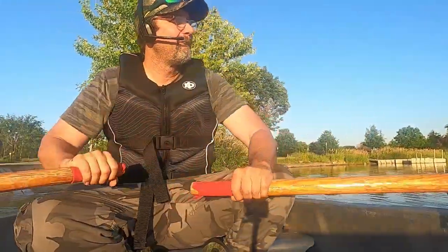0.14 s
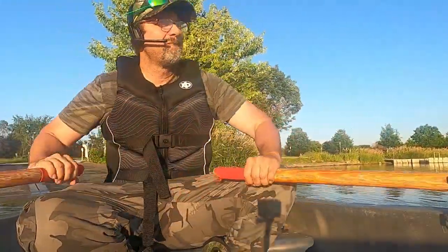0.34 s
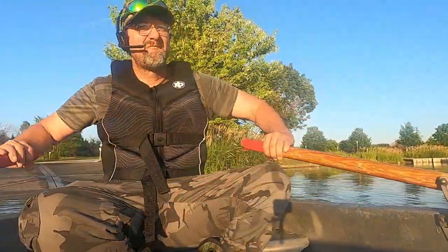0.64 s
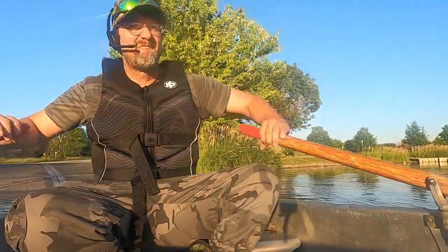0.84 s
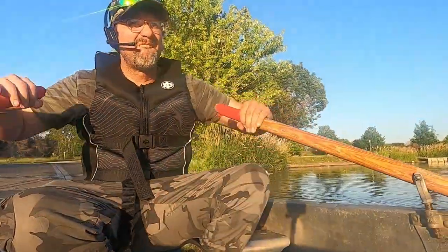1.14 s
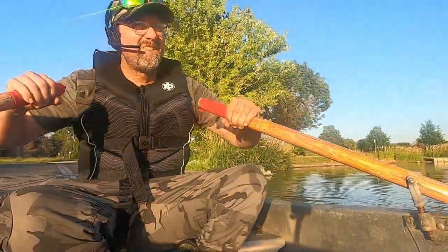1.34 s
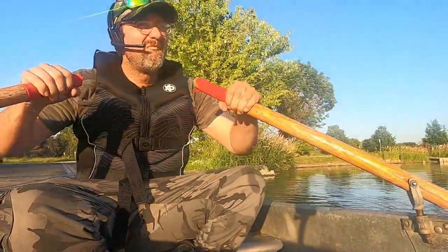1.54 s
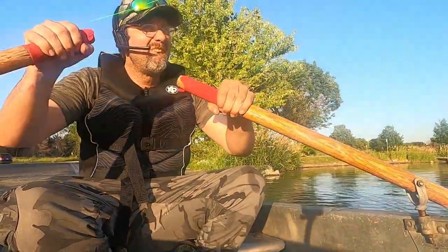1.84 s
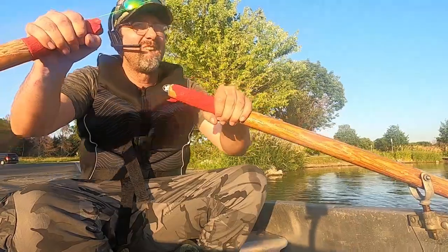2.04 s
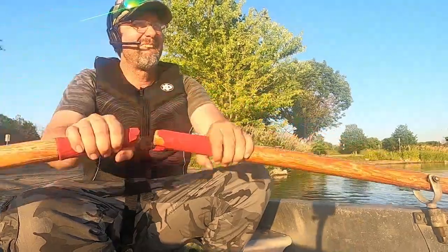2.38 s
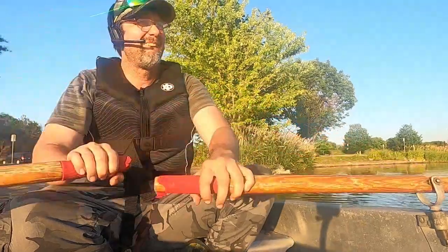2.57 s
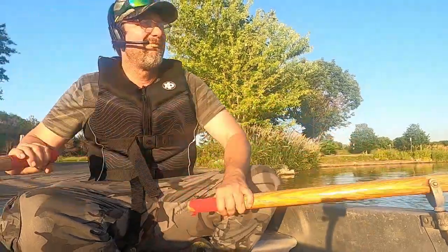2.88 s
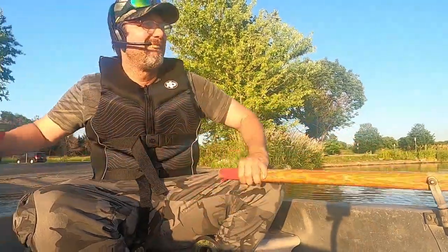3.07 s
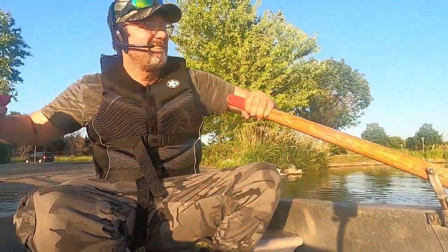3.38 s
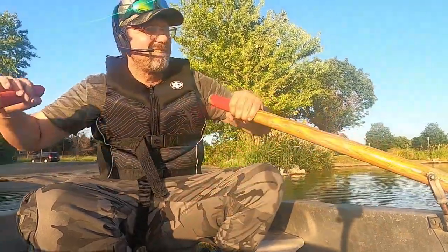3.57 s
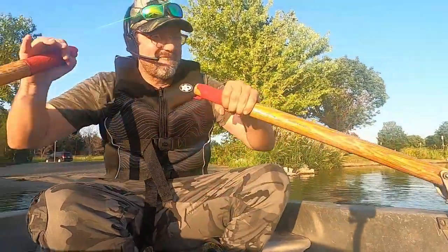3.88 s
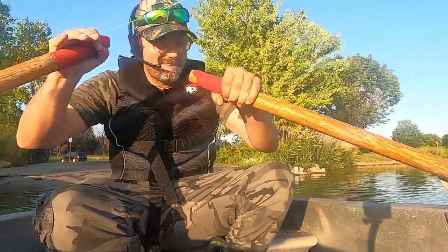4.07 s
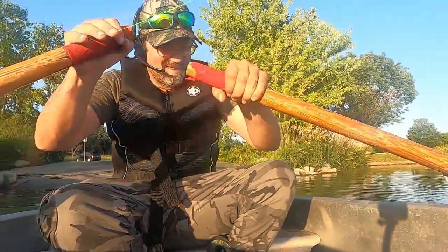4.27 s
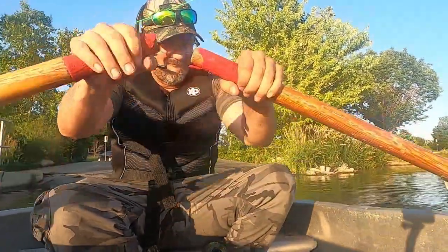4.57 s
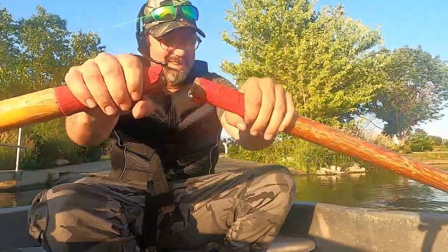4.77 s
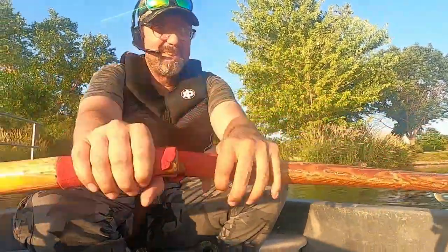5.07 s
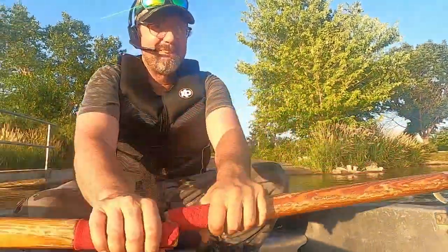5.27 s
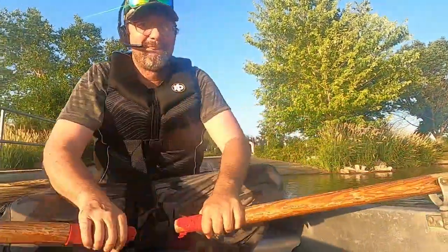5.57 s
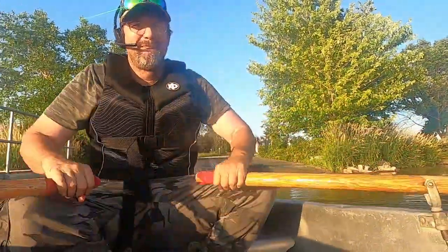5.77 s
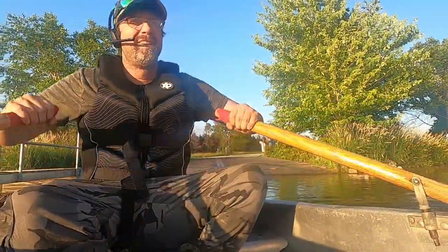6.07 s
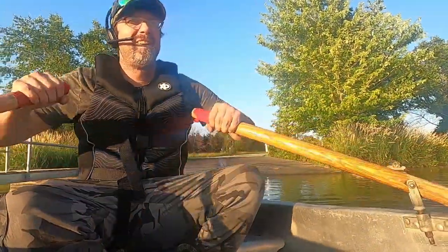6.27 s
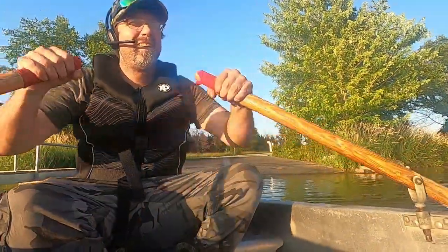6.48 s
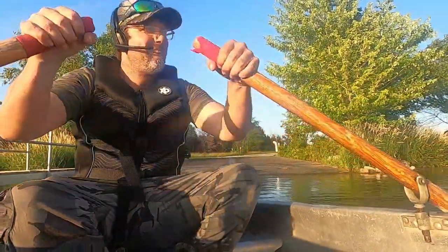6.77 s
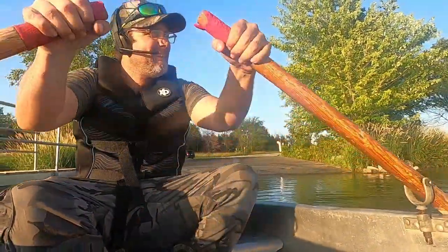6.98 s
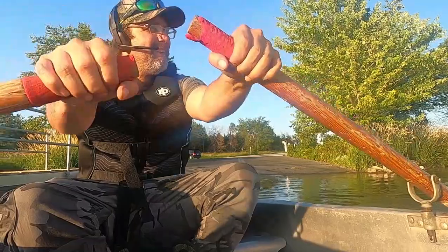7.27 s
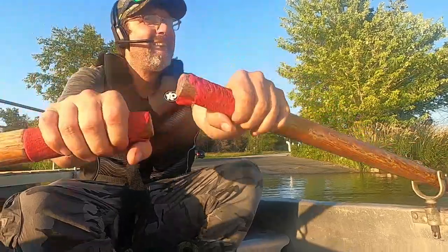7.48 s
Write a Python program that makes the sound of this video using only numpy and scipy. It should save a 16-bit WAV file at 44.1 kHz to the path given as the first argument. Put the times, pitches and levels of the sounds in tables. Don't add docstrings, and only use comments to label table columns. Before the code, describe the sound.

Close-up rowing on open water: heavy hull thuds, sharp woody clacks, metallic ticks and rasps, bubbly plops, and faint distant birdsong.

```python
import sys
import numpy as np
from scipy import signal
from scipy.fft import rfft, irfft, next_fast_len
from scipy.io import wavfile
from scipy.ndimage import uniform_filter1d, map_coordinates

SR = 44100
rng = np.random.default_rng(int(sys.argv[2]) if len(sys.argv) > 2 else 0)


def to_wav(sig):
    pcm = np.clip(np.atleast_2d(sig), -1, 1) * 32767
    pcm = np.round(pcm).astype(np.int16)
    wavfile.write(sys.argv[1], SR, pcm.T)


def voltage_ratio(level):
    return 10 ** (np.asarray(level, float) / 20)


N = 336483

# frequency in Hz, width in Hz, level in dB.
HULL_MODES = [(38, 16.3, -7), (70.9, 16.9, -1), (113, 24.1, 1), (157.5, 31, 0.5), (176.8, 30.4, -0.5),
              (217.6, 33, -2.5), (259.8, 47, -9), (362.4, 54, -15)]
# frequency in Hz, width in Hz, level in dB.
SHAFT_MODES = [(356, 150, 1), (526, 210, -1.5), (648, 112, -0.5), (1060, 175, -5.5)]
# frequency in Hz, width in Hz, level in dB.
LOCK_MODES = [(1350, 280, 0), (1787, 1020, -0.5), (2480, 1010, 0.5), (3000, 510, 0), (4200, 640, -6.5)]
# frequency in Hz, width in Hz, level in dB.
PIN_MODES = [(4820, 2900, 11.15), (6570, 1300, 15.8), (8500, 1060, 16.1), (11960, 1700, 4.6)]


def unit(x):
    return x / np.sqrt(np.mean(x ** 2, axis=-1, keepdims=True) + 1e-20)


def along(points, hz):
    f, v = np.transpose(points)
    return np.interp(np.log(hz + 1), np.log(f + 1), v)


def wobble(rate):
    knots = rng.standard_normal(int(N * rate / SR) + 4)
    return map_coordinates(knots, [np.arange(N) * rate / SR])


def filtered(x, response):
    n = x.shape[-1]
    m = next_fast_len(n + min(n // 4, 4096))
    return irfft(rfft(x, m) * response(np.fft.rfftfreq(m, 1 / SR)), m)[..., :n]


def modes(table):
    def response(f):
        total = 0
        for k, (c, w, db) in enumerate(table):
            total = total + (-1) ** k * voltage_ratio(db) * 1j * f * w / (c * c - f * f + 1j * f * w)
        return total
    return response


def ports(pair):
    # frequency in Hz, left-right correlation as a share.
    likeness = [(50, 0.93), (300, 0.98), (1000, 0.73), (4000, 0.63), (10000, 0.4)]

    def turn(hz):
        return np.arccos(np.clip(along(likeness, hz), -1, 1)) / 2

    mid = filtered(pair[0], lambda hz: np.cos(turn(hz)))
    side = filtered(pair[1], lambda hz: np.sin(turn(hz)))
    return np.array([mid + side, mid - side])


def panned(x, db):
    return x * voltage_ratio(db * np.array([[.5], [-.5]]))


def placed(sounds, times):
    first = np.round(times * SR).astype(int)
    at = (first[:, None] + np.arange(np.shape(sounds)[-1])).ravel()
    return np.array([np.bincount(at, np.ravel(c), N)[:N] for c in sounds])


def bursts(t60, rise, body, chatter_db, blow, ring_hz=0, ring_db=-60, ring_q=5, dull_hz=20000,
           size=SR // 6):
    t = np.arange(size) / SR
    raw = np.moveaxis(rng.standard_normal((len(t60), 3, size)), 1, 0)
    firm_s = 0.008
    loose = (unit(uniform_filter1d(raw[2], 130)) - .5) * (1 - np.exp(-t / firm_s))
    life = t / np.clip(t60, .01, 1)[:, None]
    force = raw[:2] * voltage_ratio(-60 * life / 0.5)
    force = force + 1.96 * uniform_filter1d(raw[:2], size=7) * voltage_ratio(-60 * life)
    force = force * (1 - np.exp(-t / rise)) * voltage_ratio(chatter_db * loose)
    force[0] -= blow * (t / rise) * np.exp(-t / rise)
    c, soft = np.reshape(ring_hz, (-1, 1)), np.reshape(dull_hz, (-1, 1))

    def response(f):
        damping = 1j * f * c / ring_q
        ring = 1 + voltage_ratio(ring_db) * damping / (c * c - f * f + damping + 1e-9)
        return modes(body)(f) * ring / (1 + 1j * f / soft) ** 2

    out = filtered(force, response)
    return out / np.abs(out[0]).max(axis=-1, keepdims=True)


def rubbing(colour, lump_db, lump_rate, patchy_db):
    z = signal.stft(rng.standard_normal((2, N)), nperseg=512)[2]
    field = uniform_filter1d(rng.standard_normal(z.shape[1:]), 5, 0)
    field = uniform_filter1d(field, 6, 1)
    pair = signal.istft(z * voltage_ratio(patchy_db * field / field.std()), nperseg=512)[1][:, :N]
    return unit(filtered(pair * voltage_ratio(lump_db * wobble(lump_rate)), colour))


def bird():
    # start in s, end in s, first pitch in Hz, last pitch in Hz, level in dB.
    notes = [(.005, 0.026, 3080, 2780, -45), (.03, 0.062, 2620, 2550, -50), (0.06, 0.113, 2250, 2230, -50),
             (0.14, 0.217, 4070, 4100, -55), (0.382, 0.441, 2980, 2980, -33.5),
             (.42, 0.464, 2800, 2270, -42), (0.49, .532, 2600, 2260, -41), (0.882, 0.906, 3000, 3230, -42),
             (0.902, 0.934, 3070, 2720, -34), (1.492, 1.529, 2866, 2980, -37.5),
             (1.536, 1.567, 2610, 2655, -34.5), (1.56, 1.63, 2450, 2250, -44),
             (1.69, 1.732, 2110, 2150, -47), (1.893, 1.94, 2800, 2650, -46),
             (1.935, 1.965, 2600, 2500, -46), (1.98, 2.008, 3250, 3300, -48.5),
             (1.992, 2.078, 2500, 2420, -38), (2.076, 2.138, 2600, 2750, -34),
             (2.135, 2.163, 2750, 2700, -45), (2.563, 2.601, 2800, 3000, -44),
             (2.612, 2.632, 2650, 2800, -46), (2.634, 2.679, 2420, 2230, -49),
             (2.698, 2.72, 2550, 2550, -49), (2.72, 2.751, 2300, 2000, -52), (2.75, 2.794, 1960, 2150, -51),
             (3.135, 3.196, 2500, 2540, -50), (7.075, 7.131, 2720, 2830, -31.5),
             (7.119, 7.156, 2540, 2520, -34.5), (7.525, 7.552, 2680, 2680, -38),
             (7.548, 7.596, 2950, 2930, -32.5), (7.592, 7.62, 2640, 2480, -35)]
    start, end, from_hz, to_hz, db = np.transpose(notes)[..., None]
    t = np.arange(SR // 8) / SR
    u = np.clip(t / (end - start), 0, 1)
    arch = 1 + 0.0384 * np.sin(np.pi * u)
    waver = 1 + 0.01 * unit(uniform_filter1d(rng.standard_normal(u.shape), 300))
    hz = (from_hz + (to_hz - from_hz) * u) * arch * waver
    tone = np.sin(2 * np.pi * np.cumsum(hz, axis=1) / SR)
    soft_ends = np.abs(np.sin(np.pi * u)) ** 0.32 * (u < 1)
    song = placed([voltage_ratio(db - 1.0 + 280 * (waver - 1)) * soft_ends * tone], start[:, 0])
    tail = rng.standard_normal((2, len(t))) * voltage_ratio(-60 * t / 0.18)
    echo = signal.fftconvolve(song, tail / np.linalg.norm(tail[0]), axes=1)[:, :N]
    return panned(song, -1.4) + voltage_ratio(-5) * echo


def rocking():
    # frequency in Hz, width in Hz, level in dB.
    sway_modes = [(39.25, 4.3, 0)]
    # time in s, rise over the steady rocking in dB.
    heaves = [
        (3.6, 3),
        (4.5, 4),
        (7.1, 14),
        (7.45, 16),
    ]
    t = np.arange(N) / SR
    level_db = -34 + sum(db * np.exp(-((t - at) / 0.1) ** 2) for at, db in heaves)
    sway = rubbing(modes(sway_modes), lump_db=2.5, lump_rate=6, patchy_db=.3)
    return panned(ports(voltage_ratio(level_db) * sway), 1.2)


def spray():
    # time in s, level in dB.
    swell = [(0.0, -71), (0.21, -65), (0.47, -58), (0.76, -52), (1.15, -56), (1.34, -66.5), (1.89, -68.5),
             (2.91, -63.5), (3.21, -56.5), (3.72, -66.5), (4.12, -57), (4.59, -65.5), (4.84, -58),
             (5.25, -71.5), (6.35, -58), (6.86, -64), (7.35, -59), (7.63, -54)]
    # frequency in Hz, density in dB per Hz.
    colour = [(2500, -29), (4200, -1), (5200, -1.5), (7000, -6.5), (8700, -0.5), (10000, -18), (12300, -16),
              (14000, -36)]
    level_db = np.interp(np.arange(N) / SR, *np.transpose(swell))
    hiss = rubbing(lambda hz: voltage_ratio(along(colour, hz)), lump_db=3.5, lump_rate=12, patchy_db=3.5)
    return voltage_ratio(level_db + 1.0) * hiss


def bubbles(s, db, hz, cycles, rise):
    turns = hz[:, None] * np.arange(SR // 10) / SR
    life = turns / cycles
    envelope = life * np.exp(1 - 3 * life) * 3
    ring = np.sin(2 * np.pi * turns * (1 + rise * life)) * envelope
    return placed([ring * voltage_ratio(db)[:, None]], s)


def plops():
    # start in s, peak in dB, pitch in Hz, pitch rise
    plop_rings = [(0.133, -28.5, 1970, 0.04), (1.236, -6, 1003, 0.018), (1.262, -14, 946, -0.04),
                  (1.582, -19, 754, 0.36), (1.664, -19.5, 1103, -.1), (1.625, -29, 1350, 0.15),
                  (1.925, -27.5, 994, 0.38), (1.955, -31, 1060, 0.026), (1.95, -34, 2050, .1),
                  (1.91, -35, 2200, 0), (2.15, -27, 1340, .05), (2.579, -24.5, 1057, .02),
                  (3.515, -26, 976, 0.053), (3.75, -34, 950, 0.21), (3.8, -28, 478, 0.27),
                  (3.96, -25.5, 603, 0.58), (3.985, -21.5, 1350, 0.0067), (3.992, -23, 595, 0.42),
                  (4.152, -25, 993, 0.016), (4.19, -29.5, 990, 0), (4.627, -17, 1010, 0.039),
                  (5.355, -35, 1080, 0), (5.378, -24, 1040, 0), (5.402, -29, 1030, 0),
                  (5.442, -29, 1000, 0.03), (5.441, -23, 1390, 0.055), (6.255, -12, 1007, 0.0013),
                  (6.429, -28, 1100, 0.14), (6.473, -26.5, 1320, 0), (6.527, -16, 670, 0.02),
                  (6.54, -26, 1040, 0.023), (6.582, -24, 910, .02), (6.607, -27, 1130, -0.023),
                  (6.718, -25.5, 748, 0.16)]
    # start in s, end in s, bubble level in dB.
    swirls = [
        (1.399, 1.719, -45.5),
        (1.721, 2.05, -49),
        (3.74, 4.051, -49.5),
        (6.451, 6.748, -52),
    ]
    s, db, hz, rise = np.transpose(plop_rings)
    gulp = bursts(0.13 + 0 * s, 0.0019, SHAFT_MODES[2:] + LOCK_MODES[:3], chatter_db=3.0, blow=.3,
                  ring_hz=hz, ring_db=25, ring_q=6.3, dull_hz=2.4 * hz, size=SR // 8)
    water = placed(ports(gulp) * voltage_ratio(db - 6.0)[:, None], s)
    water = water + bubbles(s, db - 5.0, hz, cycles=13, rise=rise[:, None] / 2)
    for a, b, level_db in swirls:
        u = rng.random((130, 3))
        times = a + (b - a) * u[:, 0]
        levels = level_db - 5 * np.log(u[:, 1] + 0.036)
        pitches = 450 * 4.6 ** u[:, 2] ** 1.38
        water = water + bubbles(times, levels, pitches, cycles=4.9, rise=0.076)
    return panned(water, 2.4)


def squeal():
    # start in s, end in s, first level in dB, last level in dB.
    slide = (4.665, 4.778, -42, -36)
    # frequency in Hz, width in Hz, level in dB.
    horn_modes = [(2200, 90, -1.5), (2800, 70, 0), (3600, 120, -11), (4350, 130, -10)]
    start, end, first_db, last_db = slide
    u = np.arange(SR // 6) / SR / (end - start)
    grain = rng.standard_normal((3, 1, len(u)))
    force = grain[:2] * voltage_ratio(4.0 * unit(uniform_filter1d(grain[2], 90)))
    level = voltage_ratio(first_db + (last_db - first_db) * u) * np.clip(5 * u, 0, 1) * (u < 1)
    return placed(level * unit(filtered(force, modes(horn_modes))), np.array([start]))


def judder():
    # start in s, peak in dB.
    slips = [(2.4204, -18), (2.4364, -17), (2.4514, -15), (2.4704, -9), (2.4874, -22), (2.788, -37),
             (2.821, -31), (2.9407, -32), (3.1008, -36), (3.1652, -35), (3.1826, -27), (4.7237, -30),
             (5.355, -37), (4.8824, -11), (6.0714, -29), (6.0804, -30), (6.092, -30), (6.103, -28),
             (6.112, -27), (3.2173, -18)]
    # start in s, peak in dB,
    # pitch in Hz.
    pin_rings = [(.2723, -10.5, 4200), (3.3565, -28, 10300), (5.485, -33, 3250), (0.9921, -32, 5900),
                 (1.2974, -29, 5140), (2.5187, -28, 5060), (3.5154, -29, 5060), (4.2088, -36, 5620),
                 (4.873, -20, 5400), (6.249, -16.5, 8540), (6.2846, -39, 5150), (6.3166, -19, 11300),
                 (6.6373, -38, 5070), (7.192, -26, 6100), (7.6255, -23, 5100)]
    s, db = np.transpose(slips)
    tick = bursts(.014 + 0 * s, .0001, LOCK_MODES + PIN_MODES[:1], chatter_db=3.5, blow=4.7, size=SR // 20)
    ticks = placed(tick * voltage_ratio(db - 3.5)[:, None], s)
    s, db, hz = np.transpose(pin_rings)
    ping = bursts(.05 + 0 * s, .0001, PIN_MODES, chatter_db=6.5, blow=3,
                  ring_hz=hz, ring_db=18, ring_q=9, size=SR // 20)
    pings = placed(ping * voltage_ratio(db)[:, None], s)
    return ports(ticks + pings + squeal())


def skids():
    # start in s, end in s, first level in dB, last level in dB.
    slides = [
        (2.36, 2.4, -45, -26.5),
        (4.686, 4.775, -48, -32),
        (6.062, 6.13, -34, -29),
        (1.25, 1.32, -38, -37),
    ]
    t = np.arange(N) / SR
    level = 0
    for a, b, a_db, b_db in slides:
        level = level + voltage_ratio(np.interp(t, [a, b], [a_db, b_db])) * (t > a) * (t < b)
    level = uniform_filter1d(level, round(0.0098 * SR))
    body = SHAFT_MODES[2:] + LOCK_MODES + [(6000, 4000, -18)]
    skid = rubbing(modes(body), lump_db=2.5, lump_rate=200, patchy_db=1.2)
    return panned(ports(level * skid), 1.2)


def surges():
    # start in s, peak in dB, strongest panel in Hz, decay by 60 dB in s.
    leans = [(0.027, -15.5, 120, 0.13), (.427, -16, 223, .1), (0.51, -10, 124, 0.56),
             (.915, -2.5, 110, 0.24), (.965, -4, 98, 0.41), (1.089, -13.5, 200, 0.11),
             (1.85, -24, 400, 0.33), (1.95, -24.5, 402, 0.18), (2.105, -12, 248, 0.21),
             (2.36, -6.5, 135, 0.32), (2.42, -5.5, 250, 0.24), (2.835, -11.5, 200, 0.15),
             (2.858, -8, 156, 0.25), (2.893, -12, 238, 0.22), (2.94, -10.5, 130, 0.1),
             (2.968, -3, 132, .09), (3.008, -13, 160, 0.08), (3.54, -8.5, 112, 0.22),
             (3.676, -21.5, 148, 0.092), (4.325, -7.5, 200, 0.17), (4.35, -8, 63, 0.35),
             (4.653, -18, 86, 0.16), (4.715, -12.5, 134, 0.092), (4.81, -4.5, 177, 0.24),
             (5.6, -22.5, 340, 0.41), (6.025, -17.5, 157, 0.18), (6.401, -18, 151, 0.12),
             (6.488, -22.5, 132, 0.19), (6.976, -20, 79.5, 0.3), (7.392, -1, 115.6, 0.37)]
    s, db, hz, t60 = np.transpose(leans)
    swell = bursts(1.4 * t60, 0.0045, HULL_MODES + SHAFT_MODES[:1], chatter_db=2.0, blow=0.33,
                   ring_hz=hz, ring_db=17.5, ring_q=3.9, dull_hz=450, size=SR // 4)
    return panned(placed(ports(swell) * voltage_ratio(db)[:, None], s), 1.2)


def thuds():
    # start in s, peak in dB, strongest panel in Hz, decay by 60 dB in s.
    blows = [(0.281, -2.5, 346, 0.31), (0.766, -8.5, 200, 0.3), (0.893, 2.5, 149, 0.26),
             (1.062, -7, 78, 0.061), (1.237, -2, 92.3, 0.53), (2.08, -7, 164, 0.23), (2.401, 3.5, 70, 0.51),
             (2.46, -4, 80.5, 0.092), (3.045, -8.5, 216, 0.11), (3.198, 0.5, 179, 0.59),
             (3.357, -3, 96, 0.09), (4.306, -3.5, 233, 0.2), (4.773, 0.5, 137, 0.53),
             (4.87, -8.5, 164, 0.6), (5.231, -14.5, 170, 0.18), (5.397, -13, 256, 0.26),
             (5.522, -17, 118, 0.27), (5.911, -10, 159, 0.21), (6.135, 2, 187, 0.2),
             (6.246, -3, 123.5, 0.57), (6.319, -6.5, 106, 0.11), (6.543, -4, 149, 0.54),
             (7.372, -7.5, 60, 0.18), (7.598, -11.5, 234, 0.23)]
    # frequency in Hz, width in Hz, level in dB.
    prompt_modes = [(200, 210, -2)]
    s, db, hz, t60 = np.transpose(blows)
    boom = bursts(2.2 * t60, 0.00041, HULL_MODES + SHAFT_MODES[1:3] + prompt_modes, chatter_db=2.0, blow=14,
                  ring_hz=hz, ring_db=10, ring_q=2.2, dull_hz=360, size=SR // 4)
    return panned(placed(ports(boom) * voltage_ratio(db + 0.5)[:, None], s), 1.2)


def contacts(slams, taps, rattles):
    def light(rows, t60):
        return [(*row, 1710 + 47.5 * max(-row[2], 0), t60) for row in rows]

    return [(*row, 0.1) for row in slams] + light(taps, 0.064) + light(rattles, 0.13)


def clanks(table, pan_db):
    s, db, knock_db, tick_db, hz, t60 = np.transpose(table)
    knock = bursts(2.0 * t60, 0.00073, SHAFT_MODES, chatter_db=1.0, blow=4.3, dull_hz=2500)
    clack = bursts(1.105 * t60, .0001, LOCK_MODES, chatter_db=3.5, blow=11.4, ring_hz=hz, ring_db=5.5,
                   ring_q=6, dull_hz=hz + 5000 * voltage_ratio(1.24 * (tick_db + 24.0)))
    tick = bursts(1.0 * t60, .0001, PIN_MODES, chatter_db=3.0, blow=3.5)
    clank = voltage_ratio(knock_db + 3.5)[:, None] * knock + clack + voltage_ratio(tick_db + 13.0)[:, None] * tick
    return panned(placed(ports(clank) * voltage_ratio(db)[:, None], s), pan_db)


def far_lock():
    # start in s, clack peak in dB, wood knock in dB over it,
    # metal tick in dB over it, horn ring in Hz.
    slams = [(1.2382, -4, -8.5, -21, 3880), (2.0809, -17.5, 2, -18.5, 2700),
             (2.4597, -11.5, 0, -21.5, 2160), (2.5021, -14.5, -1.5, -19.5, 3120),
             (3.3532, -14, 7.5, -43, 1300), (3.364, -7, -8, -18.5, 1750), (4.8716, -1, -10, -22, 4370),
             (4.8944, -10.5, -19, -13, 2480), (4.9313, -15.5, -6, -24, 2230), (4.952, -14, -4, -22, 3520),
             (6.132, -6.5, -1, -34.5, 1500)]
    # start in s, clack peak, wood knock and metal tick in dB.
    taps = [(0.435, -32, -4, -22), (0.4589, -33, -10, -17), (0.8825, -27, -8, -12), (0.911, -26, 9, -22),
            (2.1486, -41, 0, -42), (2.587, -31.5, 11, -8.5), (4.504, -48, -22, -3), (5.4886, -37, -7, -15),
            (6.174, -30, -2, -19), (7.191, -21.5, -10, -12.5), (7.5138, -26.5, -17, -24)]
    # start in s, clack
    # peak, wood knock and metal tick in dB.
    rattles = [(1.2303, -20.5, 6.5, -23), (1.3184, -23.5, 6, -20.5), (1.623, -27.5, -0.5, -27),
               (2.444, -20.5, 7.5, -10), (4.3328, -31, 11, -20), (5.3887, -41, 11, -7),
               (5.4383, -31, 2, -28), (6.2891, -22.5, 9, -14), (6.3148, -28.5, 2, -7),
               (6.482, -32, -12, -21), (6.5794, -29, 9.5, -22), (7.6255, -26.5, -24, -5.5)]
    return clanks(contacts(slams, taps, rattles), pan_db=-0.2)


def near_lock():
    # start in s, clack peak in dB, wood knock in dB over it,
    # metal tick in dB over it, horn ring in Hz.
    slams = [(.7313, -11.5, -7.5, -29.5, 1800), (.9585, -7, -4, -28.5, 1710), (2.4016, -9, 5, -18.5, 1710),
             (3.196, -5.5, -8, -21, 3770), (3.2093, -5, 0, -31.5, 1670), (4.15, -17, -17, -35, 2750)]
    # start in s, clack peak, wood knock and metal tick in dB, ring in Hz.
    snaps = [(0.2723, -3.5, -4.5, -31.5, 4200), (.002, -35, 5, -40, 700), (0.2773, -10.5, -6, -28, 2300),
             (.286, -13.5, 3, -32, 1500), (.736, -12, -9, -37, 1800), (1.0684, -16.5, 1, -45, 694),
             (2.4615, -11, 1, -37, 1000), (2.858, -10.5, -5, -25, 3900), (2.872, -10, -5.5, -26.5, 2940),
             (2.8864, -14.5, -1.5, -30, 2300), (2.412, -15.5, 0, -29, 2590), (4.982, -28, -2, -20, 2500),
             (6.137, -10, 1, -45, 620), (6.256, -14.5, -4, -35, 1900), (4.3072, -15.5, 4.5, -46, 1200),
             (4.322, -19.5, 5, -49, 620), (7.4245, -17.5, 0, -43, 1510)]
    # start in s, clack peak, wood knock and metal tick in dB.
    taps = [(.384, -32, -2, -13.5), (0.5335, -25, -1, -21), (0.5485, -28, 0, -15), (0.5646, -27, 0, -24),
            (0.5991, -25, -7, -24), (.6395, -24.5, 2.5, -21.5), (0.6824, -25, 4.5, -20),
            (0.7677, -24, 6, -16.5), (0.8511, -26.5, -3, -14), (0.9928, -12.5, -5, -17.5),
            (1.0618, -30, 11, -41), (1.298, -16, -6, -17.5), (2.392, -24, 9.5, -22),
            (2.4298, -13.5, -1.5, -15.5), (2.8415, -30, -5, -30), (3.8383, -20.5, -9, -28),
            (4.4008, -35, 4, -18), (4.442, -36.5, 1, -16), (4.775, -12.5, 3, -16.5), (5.065, -43, 2, -10),
            (5.8956, -48.5, 20.5, -30), (6.047, -48.5, -9, -4.5)]
    # start in s, clack peak, wood knock and metal tick in dB.
    rattles = [(1.285, -25.5, 9.5, -14), (2.344, -37, 5, -20), (2.517, -17, 1, -21),
               (2.827, -26.5, -2.5, -21), (3.0479, -20, 4.5, -27), (3.2797, -18.5, -1, -26),
               (3.5144, -27, 4.5, -8.5), (3.616, -19, -2.5, -29.5), (4.209, -27, -6, -8.5),
               (4.3054, -22, 14, -27), (4.6485, -24, 5, -22.5), (4.8145, -15, -1, -28),
               (5.114, -37, -3, -10.5), (5.207, -40, 4.5, -13.5), (5.678, -40.5, -25, -8.5),
               (6.065, -31.5, 6.5, -12), (6.2454, -19, 5.5, -19), (6.6353, -34.5, 0, -3),
               (7.3691, -30.5, 4, -13), (7.485, -29.5, 0, -20)]
    short = [(*row, 0.074) for row in snaps]
    return clanks(contacts(slams, taps, rattles) + short, pan_db=2.5)


def stroke():
    # time in s, load on the hull in dB, sliding speed as rasp level in dB.
    work = [(0.0, -32, -54), (1.1, -13, -42), (1.49, -28.5, -46.5), (2.3, -34.5, -53.5), (2.53, -17.5, -58),
            (2.78, -31, -54.5), (3.42, -14.5, -42.5), (3.67, -29, -51), (4.06, -33, -43.5),
            (4.62, -29.5, -54), (4.82, -15, -30.5), (4.95, -16.5, -42), (5.25, -29.5, -62),
            (5.88, -28.5, -54), (6.27, -18.5, -44), (6.95, -30.5, -49), (7.35, -30, -52),
            (7.63, -16.5, -43)]
    # frequency in Hz, density in dB per Hz.
    wood = [(150, -42), (250, -23), (361, 0), (466, -3), (1090, -14.5), (1500, -17.5), (1950, -51),
            (3300, -120)]
    # frequency in Hz, density in dB per Hz.
    metal = [(710, -27), (1200, -4.5), (1820, -8), (2650, -8.5), (3010, -10.5), (3460, -11.5),
             (7000, -27.5), (15500, -69.5)]
    s, *levels = np.transpose(work)
    t = np.arange(N) / SR
    load_db, speed_db = (np.interp(t, s, c) for c in levels)
    hull = voltage_ratio(load_db + 2) * rubbing(modes(HULL_MODES), lump_db=2.2, lump_rate=30, patchy_db=.6)
    grind_db = -0.5 + 0.58 * load_db + 0.48 * speed_db
    grind = rubbing(lambda hz: voltage_ratio(along(wood, hz)), lump_db=2.5, lump_rate=53, patchy_db=2.5)
    scrape = rubbing(lambda hz: voltage_ratio(along(metal, hz)), lump_db=1.8, lump_rate=70, patchy_db=1.8)
    slips = (rng.random(N) < 45 / SR) * voltage_ratio(5.7 * rng.random(N))
    ticking = signal.fftconvolve(slips, voltage_ratio(-60 * t[:SR // 20] / 0.019))[:N]
    scrape = voltage_ratio(speed_db + 1) * scrape * (1 + 0.27 * ticking)
    return panned(ports(hull + voltage_ratio(grind_db) * grind + scrape), 1.2)


def scene():
    background = bird() + rocking() + spray() + plops()
    oars = judder() + skids() + surges() + thuds() + far_lock() + near_lock() + stroke()
    return background + oars


def low_pass(x):
    return signal.sosfilt(signal.butter(12, 20000, fs=SR, output="sos"), x)


def record(dry):
    # frequency in Hz, left over right in dB.
    lean = [(100, 0), (1000, 1.5), (4000, 1.6), (12000, -1.5)]
    lag, half = 2.4 / SR, np.array([[.5], [-.5]])
    x = filtered(dry, lambda hz: np.exp(-2j * np.pi * hz * lag * half) * voltage_ratio(along(lean, hz) * half))
    x = x / (1 + np.abs(x) ** 16) ** (1 / 16)
    x = filtered(x, lambda hz: (hz < 15600) / (1 + (hz / 14300) ** 12))
    return low_pass(x)


dry = scene()
out = record(dry)
to_wav(out)
```